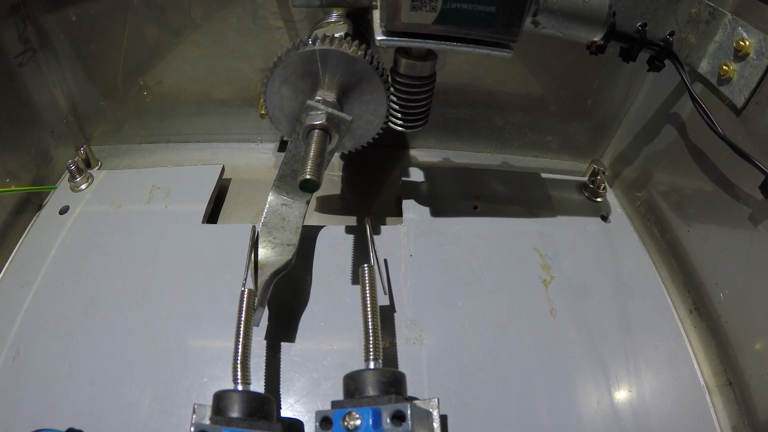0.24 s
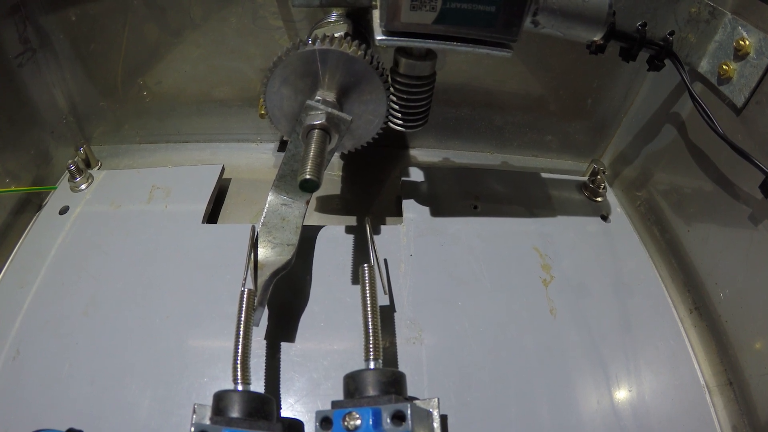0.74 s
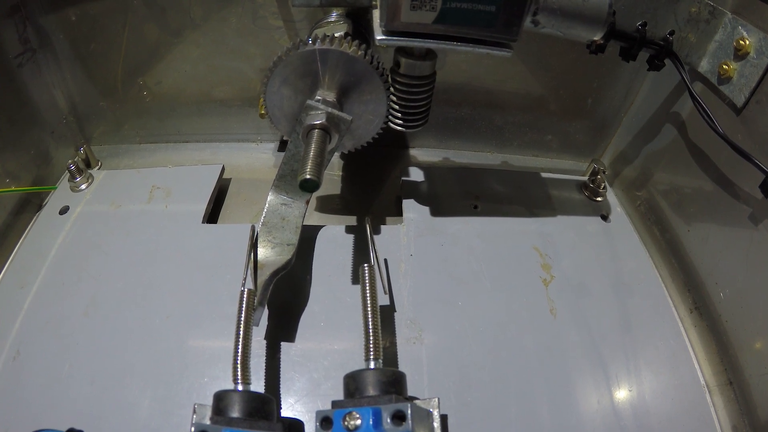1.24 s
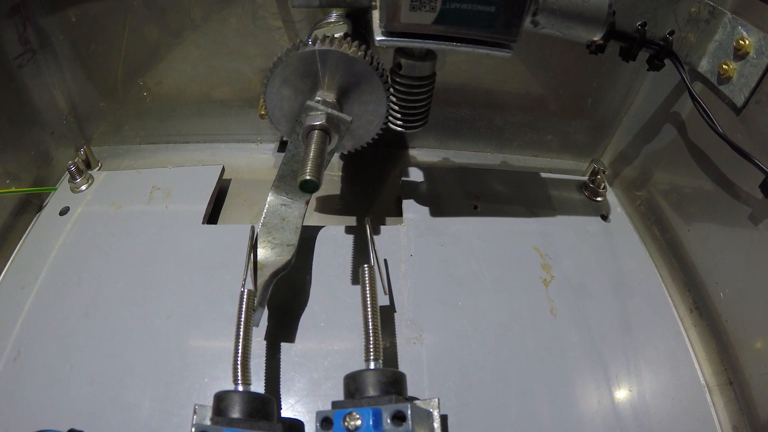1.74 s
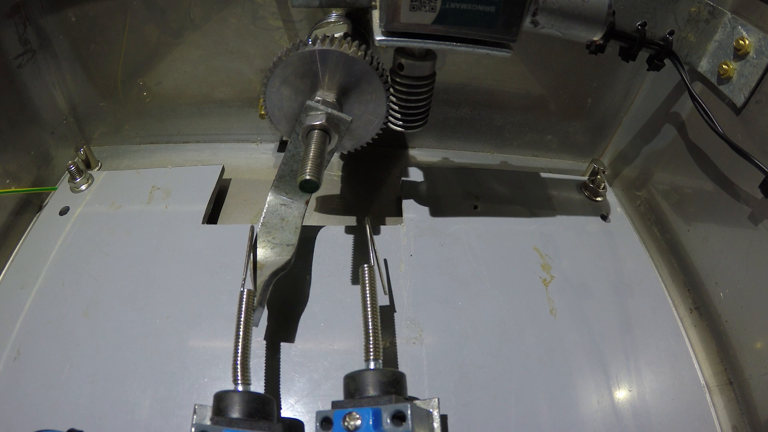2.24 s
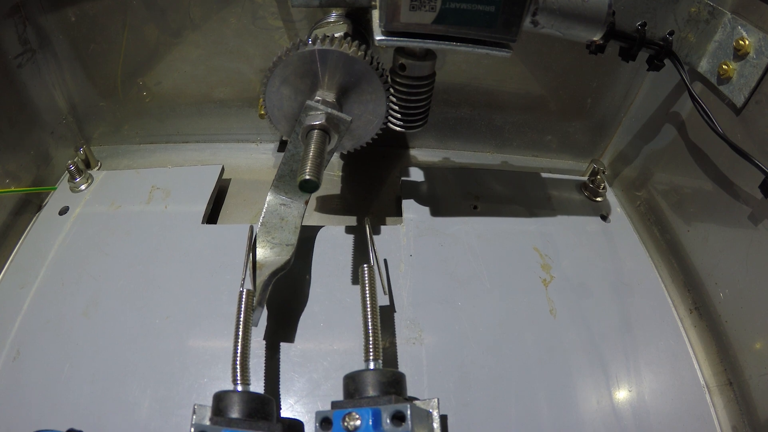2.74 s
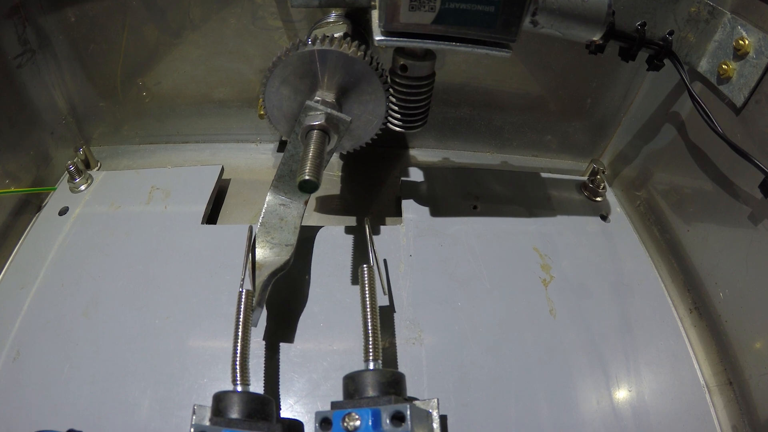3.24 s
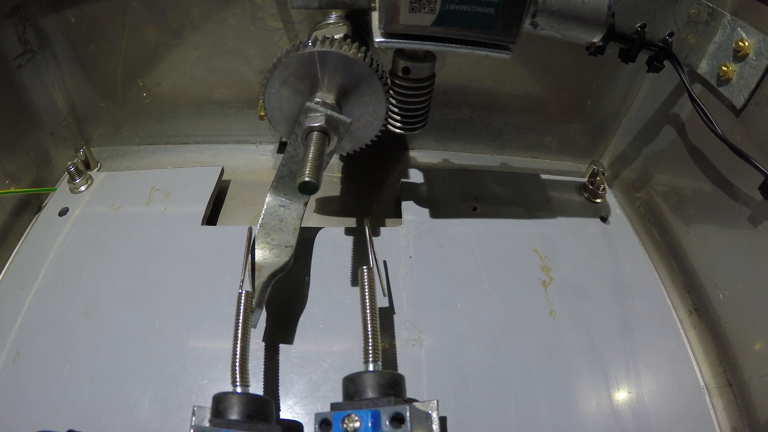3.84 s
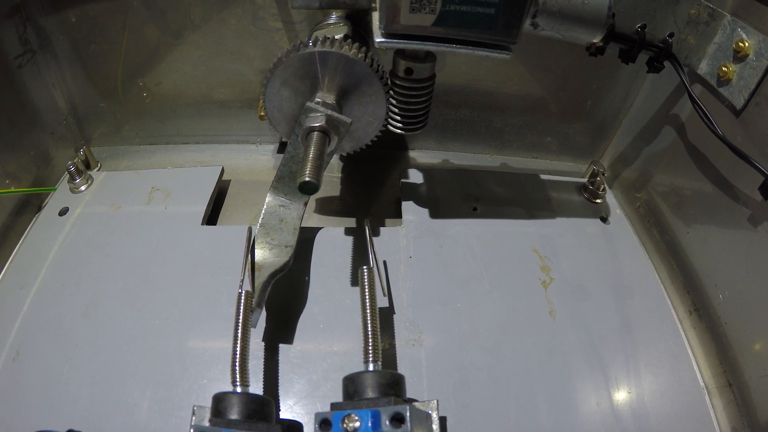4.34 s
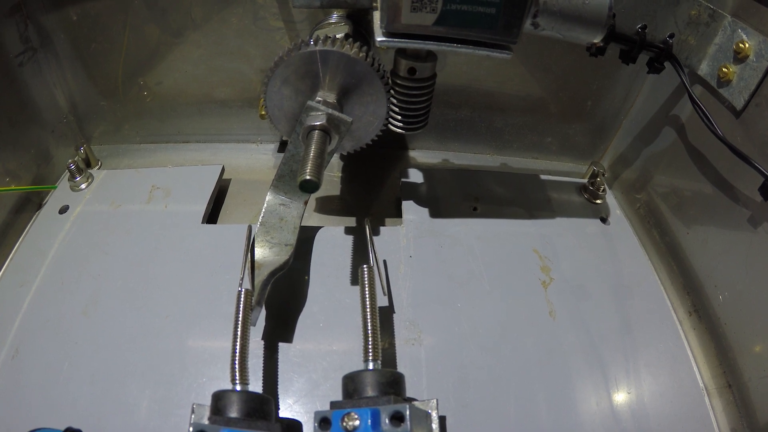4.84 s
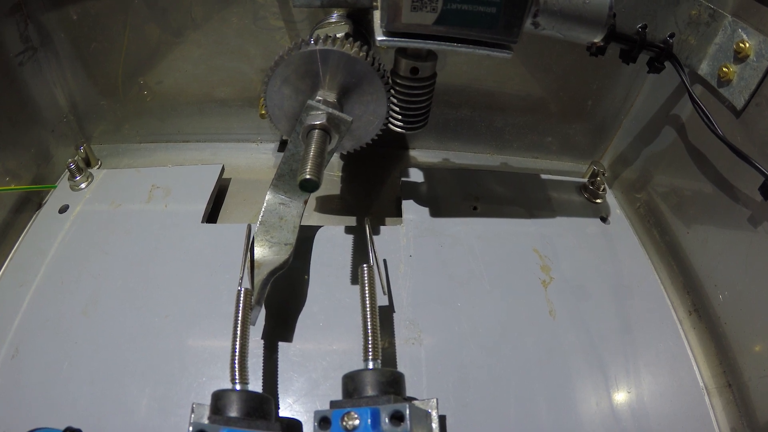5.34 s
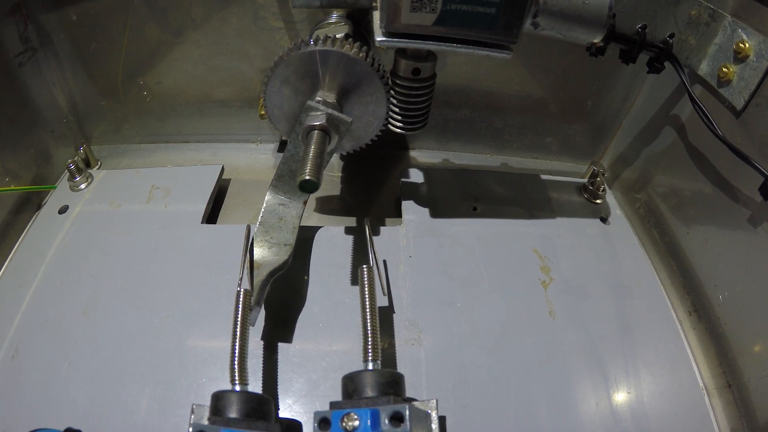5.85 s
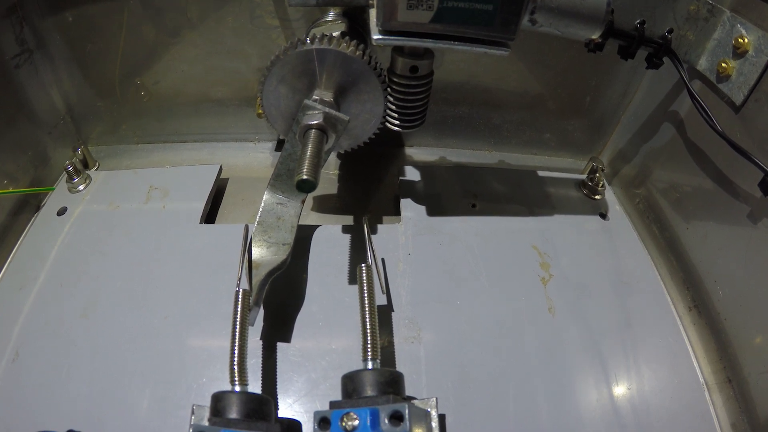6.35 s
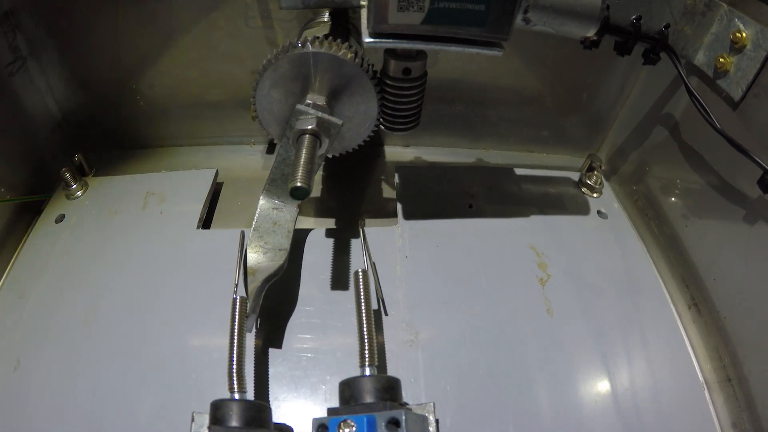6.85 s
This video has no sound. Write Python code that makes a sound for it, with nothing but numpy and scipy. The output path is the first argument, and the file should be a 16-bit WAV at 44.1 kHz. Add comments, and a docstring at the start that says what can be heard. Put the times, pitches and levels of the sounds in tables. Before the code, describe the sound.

A small electric gear motor runs close to the microphone inside a sheet-metal cabinet, with a steady whine, a fine hiss and the buzzing rattle of worn teeth. Near the end a limit switch snaps loudly, ringing the metal. The motor quickly falls in pitch and stops, its gears knocking softly. A dull handling rumble and one small tick follow over low room tone.

```python
"""A small electric gear motor runs close by in a sheet-metal cabinet, over a low room rumble.
Its rotor whines, its brushes hiss, and worn teeth grind and strike the gearbox once a motor turn;
tight spots sing as the wheel comes round. At 5.6 s a limit switch snaps and shakes the cabinet.
The motor coasts down, the gears knock in their slack and settle at about 6.2 s.
Then the microphone is moved with a dull rumble, and a small tick sounds."""
import sys
import numpy as np
from scipy import signal
from scipy.fft import rfft, irfft
from scipy.io import wavfile
from scipy.ndimage import uniform_filter1d

SR = 44100
rng = np.random.default_rng(int(sys.argv[2]) if len(sys.argv) > 2 else 0)


def wav_out(sig):
    """Save sig, one row per channel (or a flat mono array), as 16-bit PCM at SR to the path in sys.argv[1]."""
    wavfile.write(sys.argv[1], SR, np.round(np.clip(np.atleast_2d(sig).T, -1, 1) * 32767).astype(np.int16))


N = 313551
T = np.arange(N) / SR
TEETH = 24  # the wheel advances one tooth per motor turn
CUT_S, LAST_CONTACT_S, REST_S = 5.631, 6.17, 6.21  # power off, teeth part, standstill


def undb(db):
    """Decibels to gain."""
    return 10 ** (np.asarray(db) / 20)


def level(x, db):
    """Scale to an rms level."""
    return x * undb(db) / np.sqrt(np.mean(x ** 2))


def fade(t, t60):
    """Decay by 60 dB in t60 seconds."""
    return np.exp(-np.log(1000) * t / t60)


def ring(t, modes):
    """Damped modes at time t after a blow."""
    return sum(undb(db) * fade(t, t60) * np.sin(2 * np.pi * hz * t) for hz, db, t60 in modes)


def body(x, colour=None, resonances=()):
    """Ring x through a minimum-phase filter: a broad EQ curve plus steep-sided resonances."""
    freqs = np.fft.rfftfreq(16384, 1 / SR)
    power = 1e-9
    if colour is not None:
        hz, db = np.transpose(colour)
        power = undb(np.interp(np.log(freqs + 1), np.log(hz), db)) ** 2
    for centre, width, peak_db in resonances:
        power = power + undb(peak_db) ** 2 / (1 + (2 * (freqs - centre) / width) ** 4)
    cepstrum = irfft(np.log(power) / 2)
    half = len(cepstrum) // 2
    cepstrum[1:half] *= 2
    cepstrum[half + 1:] = 0
    response = irfft(np.exp(rfft(cepstrum)))[:half]
    return signal.fftconvolve(x, response)[:N]


def clicks(times, sizes):
    """Impulses, each shared between two neighbouring samples."""
    place = np.clip(times * SR, 0, N - 2)
    index = place.astype(int)
    late = place - index
    return np.bincount(index, sizes * (1 - late), N) + np.bincount(index + 1, sizes * late, N)


def flaws(turns, period, scatter, count):
    """Tiny surface contacts, count per turn, that return every period turns, never quite alike."""
    spots = rng.random(period * count) * period
    sizes = rng.choice([-1, 1], period * count)
    angles = spots + period * np.arange(int(turns[-1] / period) + 1)[:, None]
    blows = sizes + scatter * rng.standard_normal(angles.shape)
    reached = angles < turns[-1]
    return clicks(np.interp(angles[reached], turns, T), blows[reached])


def drift(rate_hz):
    """Slow random modulation with a spread of 1."""
    hold = int(SR / rate_hz)
    steps = np.repeat(rng.standard_normal(N // hold + 1), hold)
    smooth = uniform_filter1d(steps, hold)[:N]
    return smooth / smooth.std()


def tones(turns, orders, waver_db):
    """Sines locked to a shaft, each wavering in level."""
    out = np.zeros(N)
    for multiple, db in orders:
        gain = np.sqrt(2) * undb(db + waver_db * drift(14))
        out += gain * np.sin(2 * np.pi * (multiple * turns + rng.random()))
    return out


def arc(turns, place, width):
    """A smooth bump, 0-1, each time a place on a shaft comes round."""
    away = (turns - place + .5) % 1 - .5
    return np.exp(-(away / width) ** 2 / 2)


def reverb(x, t60, wet_db):
    """Dense reflections add a short tail."""
    t = T[:SR // 2]
    tail = rng.standard_normal(len(t)) * fade(t, t60) * (t > .003)
    return x + undb(wet_db) * signal.fftconvolve(x, tail / np.linalg.norm(tail))[:N]


# room tone EQ: f/Hz, level/dB
ROOM_EQ = [(20, 0), (40, -1), (65, -7), (110, -12), (180, -17), (300, -26), (600, -33), (1600, -37),
           (4000, -40), (12000, -47)]
# whistle of the electronics: f/Hz, level/dB
WHISTLE_TONES = [(2498, -77), (12484, -86)]
def room():
    """The bed: low rumble, faint hiss and a thin electronic whistle."""
    rumble = level(body(rng.standard_normal(N), ROOM_EQ), -52.5)
    whistle = sum(np.sqrt(2) * undb(db) * np.sin(2 * np.pi * hz * T) for hz, db in WHISTLE_TONES)
    return rumble + whistle


# handling noise EQ: f/Hz, level/dB
HANDLING_EQ = [(20, 0), (50, 0), (80, -8), (200, -12.5), (370, -14.5), (520, -25), (2000, -44), (8000, -60)]
def handling(start_s=6.36, swell_s=.2):
    """Dull rumble that swells as the microphone is moved."""
    swell = 1 - np.exp(-np.maximum(T - start_s, 0) / swell_s)
    return level(body(rng.standard_normal(N), HANDLING_EQ), -45.5) * swell


# bright EQ of the tick: f/Hz, level/dB
TICK_EQ = [(500, -24), (2300, -16), (3100, -5), (5500, -3), (8000, -4), (13000, -4), (15500, -11)]
def tick(start_s=6.5725, attack_s=.0008):
    """One thin tick, like a lip smack, that dies within milliseconds."""
    t = T - start_s
    envelope = fade(np.abs(t), t60=.02) * np.clip(t / attack_s, 0, 1)
    return level(body(rng.standard_normal(N), TICK_EQ), -34.5) * envelope


def backlash(start_s=5.717, attack_s=.0018):
    """A soft knock rings one panel as the load comes off the gears."""
    t = np.maximum(T - start_s, 0)
    modes = [(1230, -24, .14), (1270, -30, .13)]  # f/Hz, level/dB, t60/s
    return ring(t, modes) * (1 - np.exp(-t / attack_s))


# hits of the switch contact: t/s, level/dB
CONTACT_HITS = [(5.631, -52.5), (5.6328, 2.5), (5.636, 6.5), (5.6384, -11.5)]
# EQ of each hit's crack: f/Hz, level/dB
CRACK_EQ = [(200, -24.5), (900, -21), (2500, -29.5), (4200, -15.5), (6300, -9), (8000, -27), (11000, -24),
            (15500, -33)]
# ring of the switch and its bracket: f/Hz, level/dB, t60/s
BRACKET_MODES = [(665, -20.5, 0.11), (1602, -14.5, 0.14), (2307, -16, 0.039), (2550, -5, 0.022),
                 (2960, -22, 0.11), (3840, -31.5, 0.12), (6060, -23.5, 0.022), (6300, -24, 0.0212),
                 (6900, -14.5, 0.028), (10780, -22, 0.015)]
# low boom of the cabinet walls: f/Hz, level/dB, t60/s
WALL_MODES = [(119, -29.5, .24), (150, -33, .45), (173, -39, .3), (208, -28, .3)]
def limit_switch():
    """The contact snaps and bounces, ringing its bracket; the cabinet walls answer more slowly."""
    cracks = np.zeros(N)
    for start_s, db in CONTACT_HITS:
        envelope = fade(np.maximum(T - start_s, 0), t60=.008) * (T > start_s)
        cracks += level(body(rng.standard_normal(N), CRACK_EQ), db - 11) * envelope
    t = np.maximum(T - CONTACT_HITS[1][0], 0)  # from the first hard hit
    bracket = ring(t, BRACKET_MODES) * (1 - np.exp(-t / .0005))
    walls = ring(t, WALL_MODES) * (1 - np.exp(-t / .0098))
    return cracks + bracket + walls


# brush hiss EQ: f/Hz, level/dB
BRUSH_EQ = [(1000, -21), (5000, 1.5), (7400, 2.5), (9700, 0.5), (10900, 2), (12300, -1), (13500, -8),
            (15500, -10.5)]
def brush_hiss(turns, speed):
    """The brushes cross the same commutator flaws on every turn, so their hiss has a fine buzz."""
    crossings = flaws(turns, period=1, scatter=.5, count=400)
    return body(crossings * speed ** 3, BRUSH_EQ)


# rotor and commutator partials: multiple of the motor speed, level/dB
ROTOR_PARTIALS = [(1, -65), (3, -60), (4, -62.5), (5, -59), (6, -58.5), (7, -62), (8, -52), (9, -47),
                  (11, -55), (12, -49.5), (13, -53), (14, -51), (17, -55), (30, -55.5), (36, -50),
                  (54, -57), (57, -61), (62, -64), (63, -54.5), (69, -65), (87, -68), (95, -62.5),
                  (102, -64.5), (105, -67.5), (111, -66), (112, -68), (113, -69), (119, -68), (120, -69),
                  (123, -73), (125, -73), (127, -75), (129, -74)]
def rotor_whine(turns, speed):
    """The rotor's whine sinks in pitch and level with its speed."""
    return tones(turns, ROTOR_PARTIALS, waver_db=1.4) * speed ** 2.6


# gear mesh partials: multiple of the wheel speed, level/dB
MESH_PARTIALS = [(200, -53), (233, -54), (806, -51), (824, -50), (1027, -53), (1116, -48)]
# tight spots on the wheel: place/turns, width/turns, multiple of the wheel speed, level/dB
TIGHT_SWELLS = [(.02, .05, 254, -45.5), (.04, .05, 288, -45), (.16, .03, 303, -45), (.25, .065, 339, -40.5),
                (.26, .04, 237, -47), (.37, .05, 313, -46), (.44, .04, 247, -44.5), (.57, .045, 246, -42),
                (.68, .04, 336, -45), (.82, .06, 302, -40.5), (.95, .03, 336, -45.5)]
def gear_mesh(wheel_turns, speed):
    """The meshing teeth sing, with short swells at the same tight spots in every wheel turn."""
    steady = tones(wheel_turns, MESH_PARTIALS, waver_db=1.2)
    swells = sum(arc(wheel_turns, place, width) * tones(wheel_turns, [(multiple, db)], waver_db=-1.5)
                 for place, width, multiple, db in TIGHT_SWELLS)
    return (steady + swells) * speed ** 3.5


# EQ of the cabinet panels between their resonances: f/Hz, level/dB
PANEL_EQ = [(40, -52), (110, -17.5), (190, -16), (270, -30), (500, -17), (740, -24), (1000, -14.5),
            (1900, -15.5), (2600, -18), (5000, -36.5)]
# panel resonances: f/Hz, width/Hz, level/dB
PANEL_MODES = [(850, 36, -2), (940, 50, -5), (988, 28, 0), (1030, 32, -1), (1070, 42, .5), (1182, 50, -4.5),
               (1250, 40, 0), (1284, 26, 4.5), (1325, 22, .5), (1437, 48, 2), (1540, 24, -8),
               (1592, 40, -6), (1690, 30, -8), (1765, 70, -7.5), (2070, 28, -9), (2142, 28, -8),
               (2335, 40, -7)]
def panel_grind(turns, slowed, parted_db):
    """Rough teeth rub once a motor turn and shake the panels, which ring on."""
    contact = np.sin(np.pi * (turns + .04)) ** 2
    slack_db = -9 * slowed ** 3 * (1 - contact)  # slow teeth go slack between contacts
    scrape = flaws(turns, period=3 * TEETH, scatter=.45, count=80)
    grind = body(scrape * undb(2 * contact + slack_db + parted_db), PANEL_EQ, PANEL_MODES)
    return reverb(grind * undb(-7 * slowed ** 2), t60=.42, wet_db=-6.5)


def disperse(x, spread_s):
    """Smear blows in time: each frequency reaches the shell a little early or late by its own path."""
    hz = np.fft.rfftfreq(N, 1 / SR)
    path_hz = np.arange(0, SR / 2, 130)
    delay_s = spread_s * np.interp(hz, path_hz, rng.uniform(-1, 1, len(path_hz)))
    return irfft(rfft(x) * np.exp(-2j * np.pi * np.cumsum(delay_s) * SR / N), N)


# wear, one row a tooth: lower shell level/dB, upper shell level/dB, landing place/motor turns
TOOTH_WEAR = [(-1.5, .5, .55), (-1, -2, .32), (3, -1, .42), (2.5, .5, .38), (-2, .5, .6), (3.5, 1, .46),
              (1, 1, .4), (1, 1.5, .34), (-4.5, -2, .42), (-2.5, 1.5, .3), (-1, -2, .5), (-5, -5.5, .5),
              (-1.5, -1, .38), (-3.5, -1.5, .47), (-2, -2, .55), (3, 2, .46), (-2.5, -2.5, .34),
              (.5, -.5, .42), (1.5, 2.5, .48), (-1.5, -3.5, .5), (-.5, 2, .52), (-1, .5, .52), (3, 2.5, .5),
              (2.5, 2, .4)]
def tooth_force(turns, force_db, slowed, jitter_turns=.007, contact_turns=.17):
    """One blow as each tooth lands, in a swell of scraping; slow teeth slide more than they strike."""
    places = np.array(TOOTH_WEAR)[:, 2]
    turn = np.arange(int(turns[-1]))
    landings = turn + places[turn % TEETH] + jitter_turns * rng.standard_normal(len(turn))
    strikes = clicks(np.interp(landings, turns, T), np.ones(len(turn)))
    pressure = arc(turns, places[turns.astype(int) % TEETH], contact_turns) + .4
    scrape = flaws(turns, period=TEETH, scatter=.7, count=360) * pressure
    blows = level(strikes, 0) * undb(force_db - 22 * slowed ** 2)
    return disperse(blows, spread_s=.0031) + level(scrape, 0) * undb(force_db)


# EQ of the blows' dry edge: f/Hz, level/dB
EDGE_EQ = [(300, -43.5), (1200, -19), (2200, -17.5), (4500, -9), (5600, -17), (6200, -20.5), (6900, -17),
           (7300, -26), (7600, -23), (8700, -20.5), (9200, -17), (9500, -21.5), (10200, -33),
           (10800, -24.5), (11600, -38), (13000, -40.5), (15500, -39.5)]
def tooth_edge(turns, force_db, slowed, wear_share=.85):
    """The dry bite of the tooth blows, which softens as they slow."""
    edge_db = wear_share * force_db.mean(axis=0) - 15 * slowed ** 2
    return body(tooth_force(turns, edge_db, slowed), EDGE_EQ)


# gearbox shell resonances: f/Hz, width/Hz, level/dB
SHELL_MODES = [(2660, 50, -12), (2770, 50, -8), (2890, 50, -10), (3220, 50, -10), (3305, 50, -7),
               (3423, 44, 0), (3495, 48, -1), (3620, 150, -3.5), (3740, 40, -9), (3890, 140, -8),
               (4110, 50, -8), (4270, 150, -8), (4357, 44, -2), (4490, 150, -9.5), (4675, 50, -3),
               (4745, 90, .7), (4940, 270, -5), (5270, 120, -4.7), (5380, 90, -11)]
def shell_rattle(turns, force_db, slowed, split_hz=4600):
    """Teeth strike the gearbox; each one's wear decides whether lower or upper modes ring most."""
    lower = [mode for mode in SHELL_MODES if mode[0] < split_hz]
    upper = [mode for mode in SHELL_MODES if mode[0] >= split_hz]
    return sum(body(tooth_force(turns, db - 13 * slowed ** 3, slowed), resonances=modes)
               for modes, db in zip((lower, upper), force_db))


# last knocks of the teeth: t/s, level/dB
SETTLING_KNOCKS = [(6.184, -47.5), (6.201, -51.5)]
def settling():
    """Two soft knocks ring the shell and the panels as the gears settle."""
    knocks = sum(undb(db) * fade(np.abs(T - s), t60=.07) * (T > s) for s, db in SETTLING_KNOCKS)
    metal = body(rng.standard_normal(N), resonances=[*SHELL_MODES, *PANEL_MODES])
    return knocks * level(metal, 0)


def motor_speed(coast_s=.637, braking_power=.371):
    """Share of full speed: steady under power, then slowed by drag until friction stops the rotor."""
    coast_left = np.clip((REST_S - T) / (REST_S - CUT_S), 0, 1)
    return np.exp(-np.maximum(T - CUT_S, 0) / coast_s) * coast_left ** braking_power


def gear_motor(run_hz=101.837, drive_db=.5):
    """Grind, rattle, hiss and whine, all driven by the motor's angle."""
    speed = motor_speed()
    hz, slowed = run_hz * speed, 1 - speed
    load_wobble = .0003 * np.sin(2 * np.pi * np.cumsum(hz) / SR / TEETH)  # once per wheel turn
    turns = np.cumsum(hz * (1 + load_wobble + .00018 * drift(9))) / SR
    parted_db = np.interp(T, [LAST_CONTACT_S, REST_S], [0, -60])
    tooth = turns.astype(int) % TEETH
    force_db = np.array(TOOTH_WEAR)[tooth, :2].T + parted_db
    grind = level(panel_grind(turns, slowed, parted_db), -36.5)
    rattle = level(shell_rattle(turns, force_db, slowed), -33.7)
    edge = level(tooth_edge(turns, force_db, slowed), -40)
    hiss = level(brush_hiss(turns, speed), -49.5)
    whine = rotor_whine(turns, speed)
    mesh = gear_mesh(turns / TEETH, speed)
    return undb(drive_db) * (grind + rattle + edge + hiss + whine + mesh)


def scene():
    """Motor and switch in the cabinet, then a small dry tick, over handling noise and room tone."""
    cabinet = reverb(gear_motor() + backlash() + settling() + limit_switch(), t60=.26, wet_db=-14.5)
    small_tick = reverb(tick(), t60=.2, wet_db=-11)
    return (cabinet + small_tick + handling() + room())[None]


def record(dry, drive=1.3, top_hz=15400):
    """Soft saturation rounds the loudest peaks and a steep low-pass cuts the top."""
    rounded = np.tanh(drive * dry) / drive
    return signal.sosfilt(signal.ellip(10, .2, 80, top_hz, fs=SR, output="sos"), rounded)


dry = scene()
out = record(dry)
wav_out(out)
```